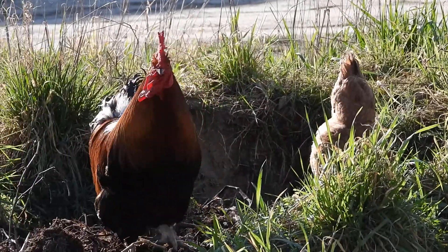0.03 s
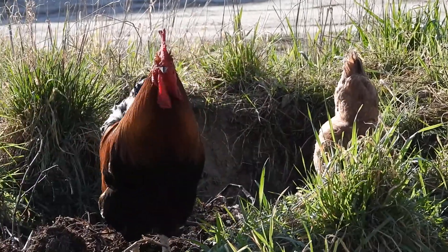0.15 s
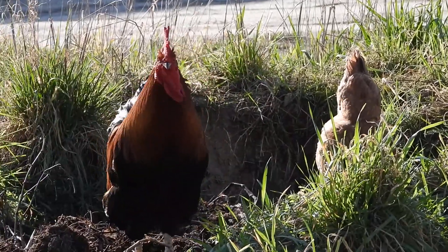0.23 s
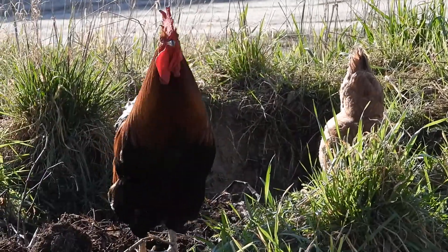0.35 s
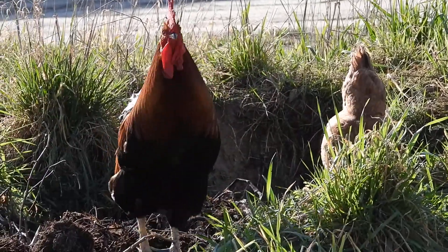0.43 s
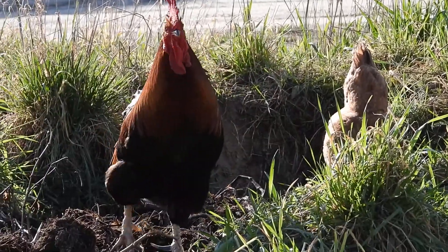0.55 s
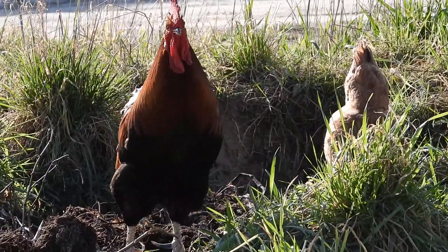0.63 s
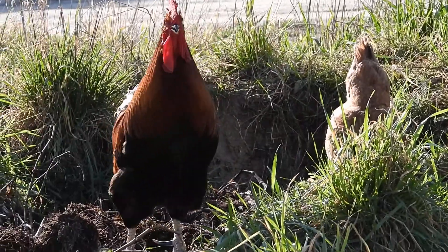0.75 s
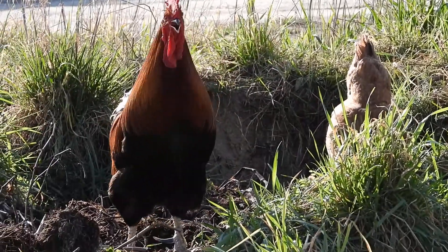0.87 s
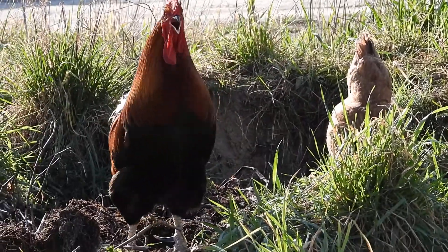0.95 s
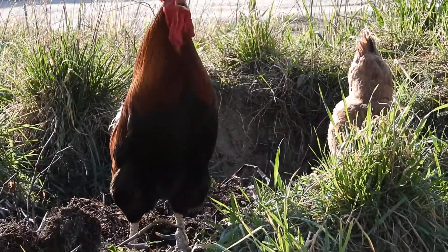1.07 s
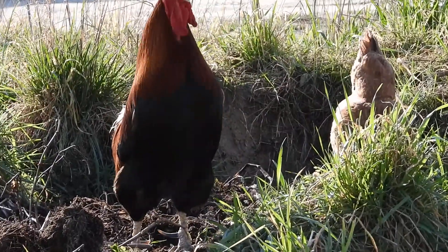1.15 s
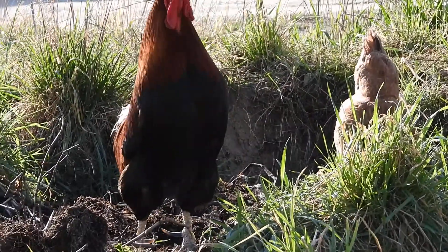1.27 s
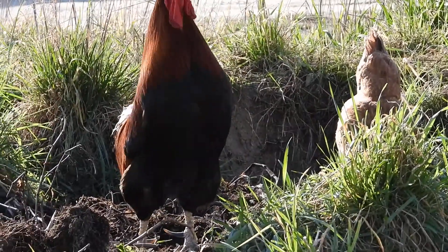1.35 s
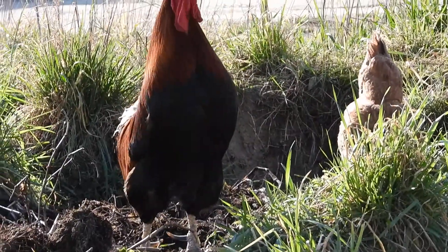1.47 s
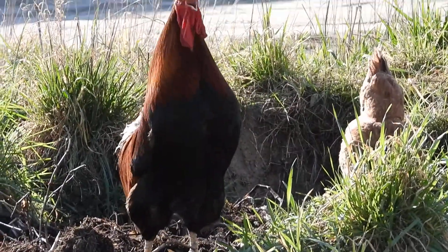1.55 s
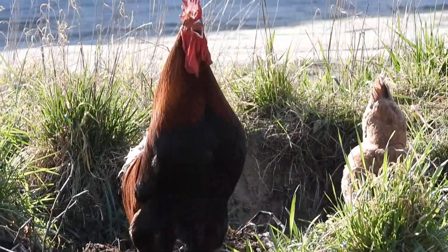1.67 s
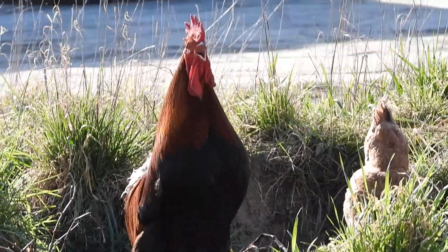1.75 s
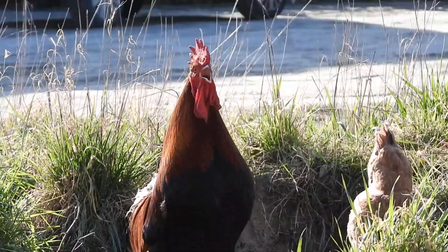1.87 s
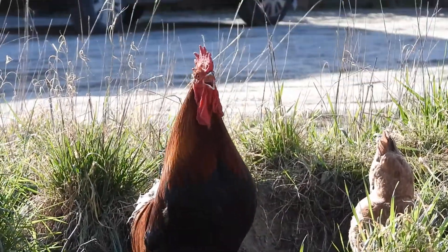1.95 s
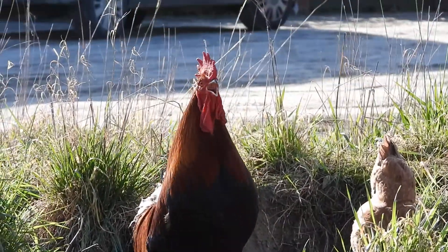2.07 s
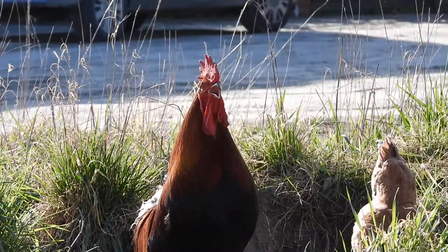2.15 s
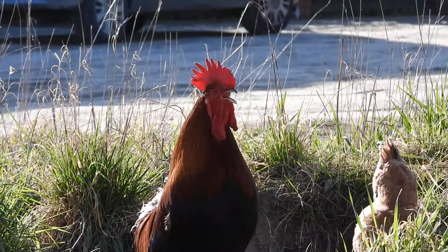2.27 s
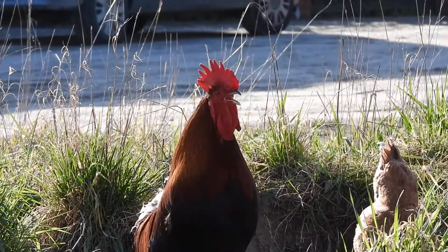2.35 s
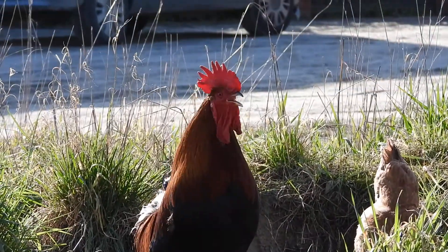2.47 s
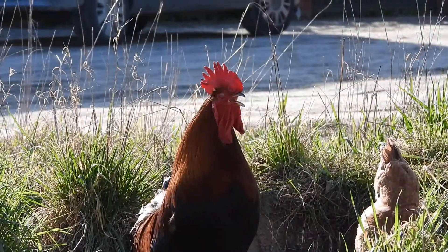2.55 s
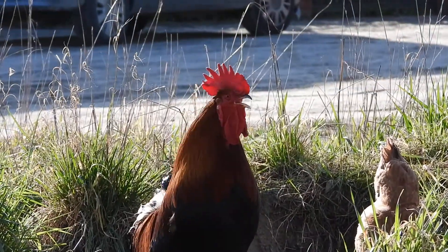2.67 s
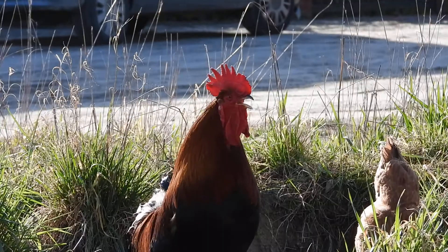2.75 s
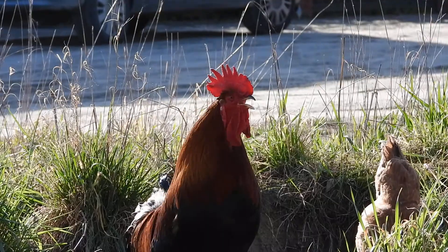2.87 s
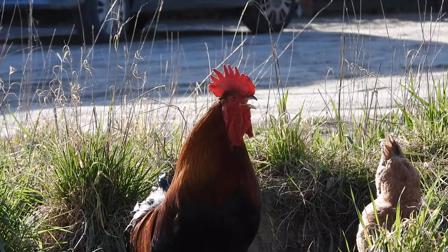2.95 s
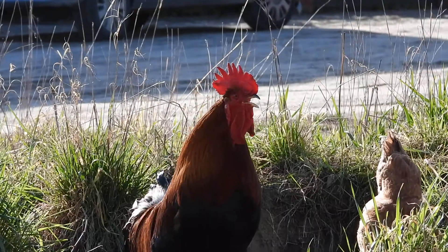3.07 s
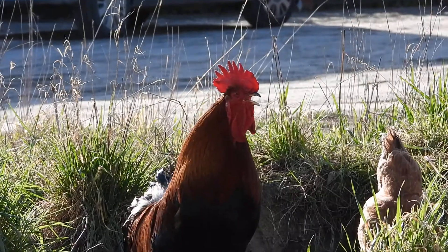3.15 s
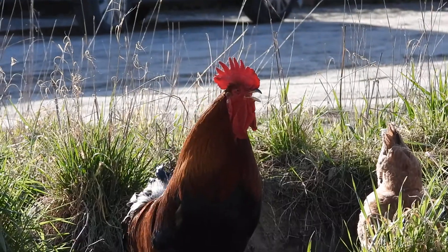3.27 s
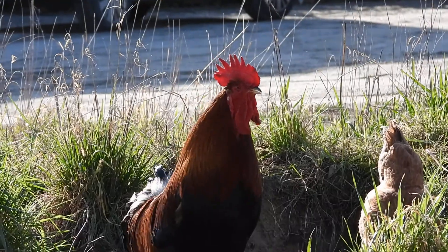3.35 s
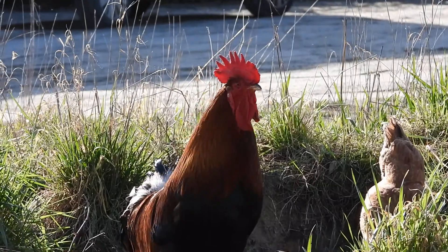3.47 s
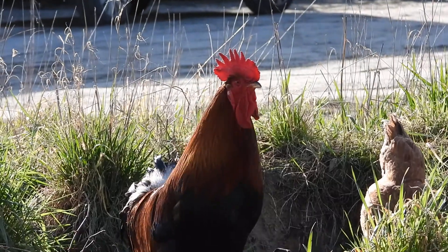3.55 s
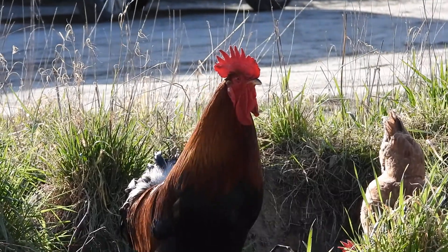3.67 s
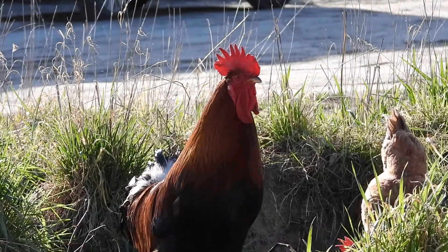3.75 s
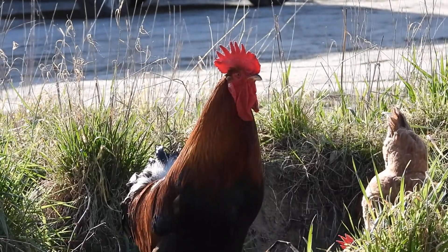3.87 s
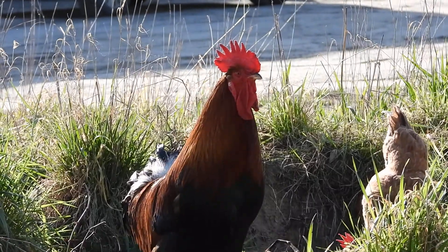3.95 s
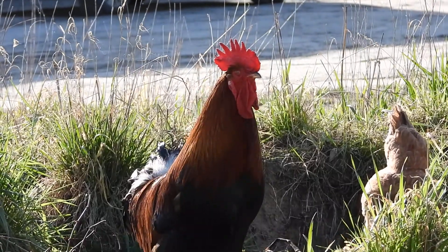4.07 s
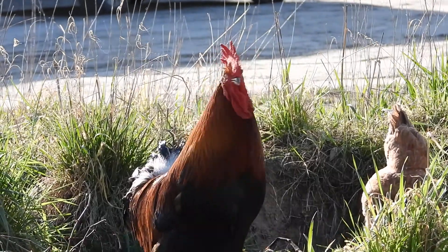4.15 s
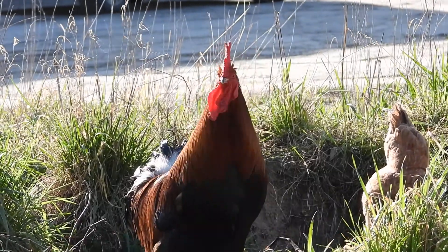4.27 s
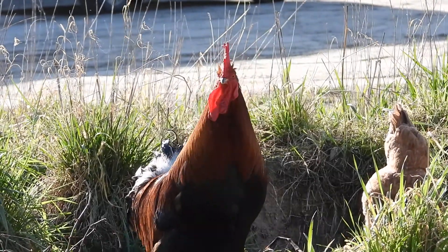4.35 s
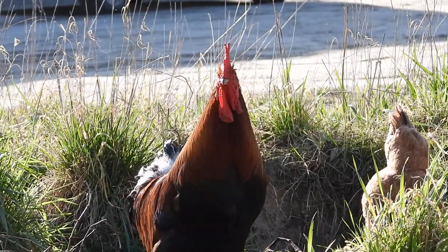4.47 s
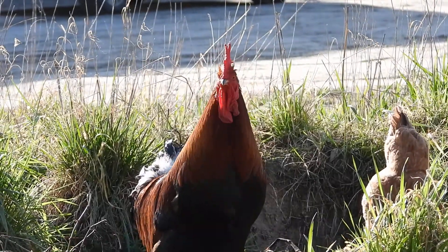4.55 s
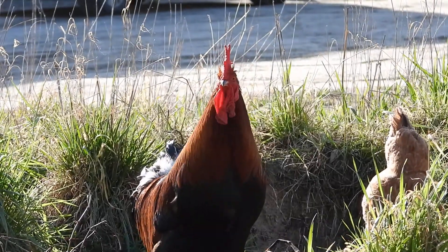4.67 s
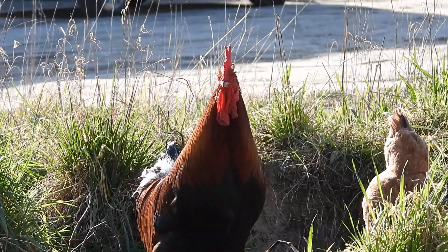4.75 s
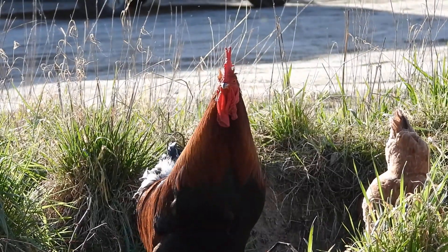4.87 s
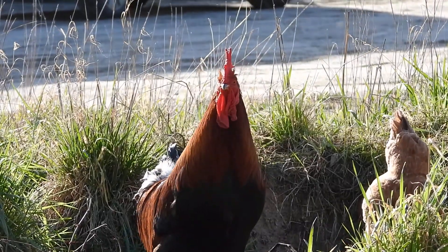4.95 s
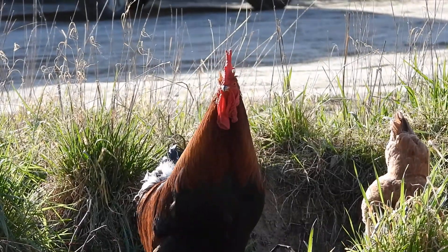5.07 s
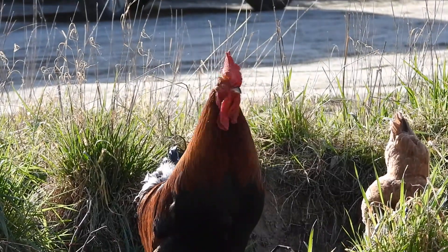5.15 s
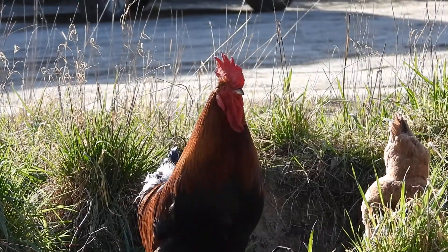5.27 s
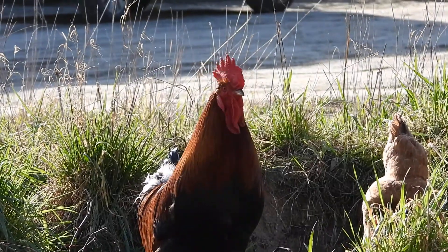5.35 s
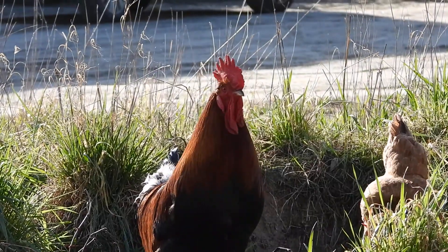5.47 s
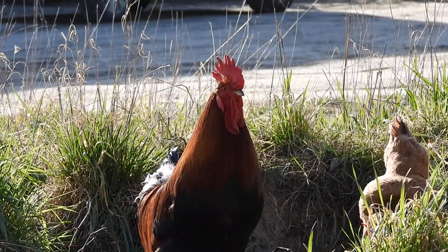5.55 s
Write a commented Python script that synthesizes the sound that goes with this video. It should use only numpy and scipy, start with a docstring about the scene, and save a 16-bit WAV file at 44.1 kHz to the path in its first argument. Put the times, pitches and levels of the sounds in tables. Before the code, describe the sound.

One loud rooster crow stands out against a quiet outdoor background of far traffic, small birds and soft puffs of high hiss. The birds come first, off to the left. Then the rooster, near the microphone, gives a brief raspy note and a long held one that drops as its breath runs out, with a slight echo. A hen's low mutter is barely heard beneath it, and scattered chirps and whistles follow.

```python
"""Distant traffic hums over a grassy yard while sparrows chirp and other small birds whistle. Then a
rooster crows close by, a short syllable and a long one: two membranes in its throat pulse air into the
windpipe, now locked to clear tones, now chaotic, and the pitch sags as the breath runs out. Far walls
send the crow back. A hen mutters once under its end, and soft puffs of bright hiss come and go."""
import sys
import numpy as np
from scipy import signal
from scipy.fft import rfft, irfft, next_fast_len
from scipy.io import wavfile
from scipy.ndimage import uniform_filter1d, map_coordinates

SR = 44100
rng = np.random.default_rng(int(sys.argv[2]) if len(sys.argv) > 2 else 0)


def waveform_to_disk(signal):
    """Save audio, clipped to [-1, 1], as 16-bit WAV at the path in sys.argv[1]."""
    frames = np.transpose(np.atleast_2d(signal))
    scaled = np.clip(frames, -1, 1) * 32767
    samples = np.round(scaled).astype(np.int16)
    wavfile.write(sys.argv[1], SR, samples)


N = 247822

# Colour of the traffic and of the hiss. Each row: frequency in Hz, relative level in dB.
TRAFFIC_SPECTRUM = [(24, -87.5), (40, -62), (91, -41), (177, -9), (329, -12.5), (364, -9), (466, -7.5),
                    (659, -8.5), (1030, -3.5), (1730, -16), (3220, -19), (3560, -19), (4680, -27.5),
                    (6950, -39.5), (15000, -75)]
HISS_SPECTRUM = [(2000, -54.0), (4000, -2.5), (6000, -10.0), (8500, -16.0), (11000, -61.0)]
# Puffs of bright hiss; the sharp one at 0.47 s is the breathy edge of a bird's rising whistle.
# Each row: peak time in seconds, peak level in dB, swell and fade in dB per second.
HISS_PUFFS = [(.2, -69, 80), (.47, -59.5, 400), (.92, -57.5, 198), (5.5, -68, 80)]
# Width of the noise bed. Each row: frequency in Hz, left-right likeness (clipped to -1..1).
BED_LIKENESS = [(60, 1.3), (180, 0.86), (550, 0.8), (1650, 1.5), (4970, -3), (15000, 0.1)]
# Panning of the bed and of the crow. Each row: frequency in Hz, left minus right in dB.
BED_PAN = [(60, -2.5), (180, -1), (550, 3), (1650, 4), (4970, 1.5), (15000, -17.5)]
CROW_PAN = [(60, -8.5), (120, -7.5), (240, -5), (480, 6), (950, -5), (1890, -2), (3770, -3), (7520, -1.5),
            (15000, -6)]
# Phase spread of the crow. Each row: frequency in Hz, lead of the left side in radians.
CROW_LEAD = [(200, 0), (700, .35), (2000, .3), (2800, .7), (4000, 1.5), (9000, 1.6)]
# The hen's mutter. Each row: time in seconds, pitch in Hz, level in dB.
HEN_MUTTER = [(3.085, 140, -94), (3.1, 171, -43), (3.14, 283, -46), (3.2, 308, -55.5), (3.28, 278, -67),
              (3.31, 273, -93)]
# Shape of one sparrow chirp. Each row: seconds into the chirp, pitch in Hz, relative level in dB.
CHIRP_SHAPE = [(0, 3080, -29), (.004, 3140, -3), (0.011, 3400, -6.5), (0.019, 4820, 3), (.024, 5450, -14.5),
               (0.032, 4790, -4), (0.043, 3443, 3.5), (.052, 3680, 3.5), (.062, 3040, -1.5),
               (.068, 2990, -22.5)]
# Sparrow cues. Each row: start in seconds, gain in dB, pitch factor.
CHIRP_CUES = [(0.081, -46.5, .95), (0.181, -58, 1.0), (3.017, -45, 1.05), (3.64, -44, 1.01),
              (4.41, -45.5, .97), (5.182, -61, 1.0), (5.443, -45, .99)]
# Whistle cues. Each row: start and length in seconds, first, middle and last pitch in Hz,
# peak level in dB, fraction of the length before the peak.
WHISTLE_CUES = [(0.413, 0.042, 2190, 1850, 1845, -55, .1), (0.452, .105, 1837, 5170, 3900, -44.5, 0.11),
                (0.509, .2, 2616, 2653, 2495, -50, 0.4), (3.639, 0.058, 3050, 3050, 3080, -48.5, .6),
                (4.319, 0.26, 2310, 2602, 2563, -48, 0.22), (5.153, 0.033, 4400, 4450, 4420, -56, .5),
                (5.542, .08, 4100, 4290, 4250, -56, 0.18)]
# Tails of the yard and of the nearby ground. Each row: frequency in Hz, seconds to fall 60 dB.
YARD_DECAY = [(300, 0.91), (1500, 0.31), (6000, 0.037)]
GROUND_DECAY = [(300, .05), (3000, 0.069), (10000, 0.048)]
# Slaps off far walls. Each row: delay in seconds, gain in dB.
WALL_SLAPS = [(.105, -27), (.15, -29), (.22, -31)]
# The crow's syllables. Each row: start and end of full voice in seconds, release in dB per second.
SYLLABLES = [(1.13, 1.3324, 1000), (1.403, 3.44, 650)]
# Held states of the membranes. Each row: start in seconds, pitch in Hz, amount of chaos,
# period doubling (every second pulse stronger) from 0 to 1, share of the second membrane from 0 to 1.
MEMBRANE_STAGES = [(1.12, 665, .26, .1, .05), (1.21, 660, .45, .4, .38), (1.295, 620, .5, .25, .15),
                   (1.38, 655, .5, 0, 0), (1.447, 774, .04, 0, 0), (1.48, 825, .04, 0, 0),
                   (1.495, 770, .04, 0, 0), (1.514, 634, .6, 0, .25), (1.7, 643, .55, 0, .58),
                   (2.1, 640, .5, 0, .35), (2.21, 637, .28, 0, .4), (2.27, 635, .09, 0, .45),
                   (2.383, 640, .38, .05, .45), (2.75, 640, .2, .15, .25), (2.8, 640, .06, .2, .04),
                   (2.895, 640, .09, .2, .1), (2.95, 640, .04, .2, .02), (3.08, 640, .02, .5, 0),
                   (3.2, 640, .02, .8, 0), (3.29, 640, .05, .8, 0), (3.325, 640, .01, .08, 0),
                   (3.4, 640, .17, .55, 0), (3.44, 600, .4, .9, 0)]
# The breath running out. Each row: time in seconds, pitch drop in Hz.
PITCH_SAG = [(2.7, 0), (2.8, 7.5), (3.0, 13.5), (3.15, 27), (3.29, 48), (3.36, 68.5), (3.4, 96),
             (3.43, 99.5), (3.48, 106)]
# The neck's movement. Each row: time in seconds, pose (0 stretched, 1 slack, 2 sinking).
NECK_POSE = [(1.27, .85), (1.33, .2), (1.4, .5), (1.44, 0), (2.05, .05), (2.24, .5), (2.375, .5),
             (2.39, .85), (2.74, 1), (3.0, 1), (3.22, 2), (3.34, 2), (3.41, 1.5)]
# The second membrane slackens with the neck. Each row: pose, pitch in Hz.
SECOND_PITCH = [(0, 1540), (.5, 1485), (1, 1383)]
# Resonances of windpipe and beak. Each row: centre in Hz for a stretched, a slack and a sinking neck,
# width in Hz, weight within its band in dB.
WINDPIPE_MODES = [(310, 330, 290, 140, 0), (754, 695, 510, 607, 1.5), (1507, 1411, 1340, 407, 0),
                  (2049, 1957, 1936, 289, 0), (2973, 2880, 2750, 220, 6.5), (3930, 4450, 2900, 240, -3),
                  (4720, 4780, 4530, 1300, 7.5), (5370, 5600, 8700, 110, 1.5), (6044, 5700, 6500, 430, 3),
                  (7600, 7300, 9000, 910, -5), (10100, 2100, 4600, 410, -10),
                  (11100, 12000, 9100, 640, -12.5)]
# Row numbers that split those resonances into seven bands, low to high.
BAND_EDGES = [0, 2, 3, 4, 5, 7, 9, 12]
# Dynamics, one curve a syllable. Each row: time in seconds, level in dB, then bands one, two and five
# in dB relative to that level.
VOICE_CURVES = [
    [(1.13, -10.5, -13.5, -9, -19.5), (1.162, -20, -3, -15, -7.5), (1.212, -10.5, -20.5, 1.5, -22.5),
     (1.22, -14, -6.5, -8.5, -18), (1.248, -11, -18.5, -1, -21.5), (1.308, -13, -8.5, -9.5, -14.5),
     (1.335, -16, -39, -15.5, -16.5)],
    [(1.4, -16.5, -21.5, -12, -16.5), (1.43, -10, -5, -10.5, -15.5), (1.47, -16, -6, 1.5, -9),
     (1.53, -12, -11, -4.5, -15), (1.56, -15, -9, -15, -18.5), (1.6, -15.5, -18.5, -12, -17),
     (1.68, -14, -7.5, -7, -13.5), (1.77, -12.5, -13.5, -1, -14.5), (2.09, -16, -11.5, -3.5, -14.5),
     (2.24, -16.5, -3, -12.5, -16), (2.38, -19, -5.5, -7.5, -20), (2.41, -20, -7.5, -4.5, -19.5),
     (2.78, -20.5, -6, -5.5, -22.5), (2.8, -22, -4.5, -9.5, -22), (3.09, -20, -5.5, -2, -21.5),
     (3.17, -23, -3.5, -6.5, -16.5), (3.35, -25, -10.5, -2.5, -12.5), (3.38, -30, -3.5, -11, -5),
     (3.42, -15.5, -0.5, -14, -20), (3.44, -24, -1.5, -3.5, -21)],
]
# Treble colour, one row a pose. Each row: bands four, six and seven in dB relative to band five.
TREBLE_BY_POSE = [(-5.5, -10.5, -20.5), (-1, -7.5, -16.5), (-9, -3.5, -16.5)]
# Notches cut by side cavities of the throat. Each row: centre in Hz, width in Hz, part swallowed in dB.
THROAT_HOLLOWS = [(3620, 500, -2.5), (5280, 350, -1.5)]

TRAFFIC_DB = -50
LEFT_LEAD_S = .00009  # sound from the left reaches the left side first
RISE_DB, FALL_DB = 7.5, 20  # a whistle swells to its peak, then dies away
ATTACK_DB_PER_S, GLIDE_S = 3500, .014  # onset of a syllable; glide from stage to stage
SCOOP_HZ, SCOOP_S = 131.2, .03  # each syllable starts flat and slides up to pitch
EDGE_CHAOS, EDGE_S = .25, .035  # extra chaos while the membranes start and stop
GROWL, GROWL_LOSS = 1.6, .7  # second membrane at half and quarter pitch; lost as the neck slackens
CEILING, TOP_HZ = .95, 15700


def amp(db):
    return 10 ** (np.asarray(db) / 20)


def unit(x):
    return x / np.sqrt(np.mean(x ** 2) + 1e-20)


def along(points, hz):
    """Read (Hz, value) points on a log frequency axis."""
    f, v = np.transpose(points)
    return np.interp(np.log(hz + 1), np.log(f + 1), v)


def curves(rows):
    """One value per sample for each column after the time."""
    s, *cols = np.transpose(rows)
    return [np.interp(np.arange(N) / SR, s, c) for c in cols]


def wobble(rate, count=N):
    """A smooth random curve, rate knots a second."""
    knots = rng.standard_normal(int(count * rate / SR) + 4)
    return map_coordinates(knots, [np.arange(count) * rate / SR])


def filtered(x, response):
    """x through a complex frequency response."""
    m = next_fast_len(N + SR // 2)
    return irfft(rfft(x, m) * response(np.fft.rfftfreq(m, 1 / SR)), m)[..., :N]


def resonance(f, modes):
    """Response of (Hz, width, dB) resonances, summed with alternating signs."""
    return sum((-1) ** k * amp(db) * 1j * f * w / (c * c - f * f + 1j * f * w)
               for k, (c, w, db) in enumerate(modes))


def pulses(phase, count):
    """A pulse train: equal harmonics of a running phase."""
    half = np.sin(phase / 2)
    half = np.where(np.abs(half) < 1e-6, 1e-6, half)
    return np.sin((count + .5) * phase) / (2 * half) - .5


def shimmer(x, depth_db, size):
    """Random swells and dips in patches of (frequency bins, frames)."""
    z = signal.stft(x, nperseg=512)[2]
    field = uniform_filter1d(rng.standard_normal(z.shape[-2:]), size[0], 0)
    field = uniform_filter1d(field, size[1], 1)
    return signal.istft(z * amp(depth_db * unit(field)), nperseg=512)[1][..., :N]


def pan(pan_db, lead):
    """Stereo response: level difference and phase lead, half on each side."""
    return (amp(pan_db / 2) * np.exp(.5j * lead)) ** np.array([[1], [-1]])


def noise_bed(spectrum, shimmer_db):
    """Coloured, shimmering stereo noise of rms 1."""
    noise = shimmer(rng.standard_normal((2, N)), shimmer_db, size=(6, 10))
    width = lambda hz: np.arccos(np.clip(along(BED_LIKENESS, hz), -1, 1)) / 2
    colour = lambda hz: amp(along(spectrum, hz)) * [np.cos(width(hz)), np.sin(width(hz))]
    mid, side = filtered(noise, colour)
    stereo = np.array([mid + side, mid - side])
    return unit(filtered(stereo, lambda hz: pan(along(BED_PAN, hz), 2 * np.pi * hz * LEFT_LEAD_S)))


def traffic():
    """Distant traffic: a low hum whose level wavers slightly."""
    return amp(TRAFFIC_DB + .6 * wobble(27)) * noise_bed(TRAFFIC_SPECTRUM, shimmer_db=1.4)


def hiss_puffs():
    """Puffs of bright hiss that swell and fade."""
    t = np.arange(N) / SR
    swells = sum(amp(db - slope * np.abs(t - s)) for s, db, slope in HISS_PUFFS)
    return swells * noise_bed(HISS_SPECTRUM, shimmer_db=1.5)


def hen():
    """A low, breathy mutter with a closed beak: pulses and noise through one steep resonance."""
    hz, db = curves(HEN_MUTTER)
    phase = 2 * np.pi * np.cumsum(hz) / SR + .67 * wobble(200)
    air = pulses(phase, count=4) + 12 * rng.standard_normal(N)
    mutter = filtered(air, lambda f: resonance(f, [(262, 350, 0)]) ** 2)
    return amp(db) * unit(mutter) * (db > HEN_MUTTER[0][2])


def bird_note(rows, breath_db, flutter_db, burr_hz):
    """A near-pure tone along (s, Hz, dB) rows; pitch and level tremble, and breath roughens it."""
    s, hz, db = np.transpose(rows)
    start = round(s[0] * SR)
    t = np.arange(start, min(N, round(s[-1] * SR))) / SR
    phase = 2 * np.pi * np.cumsum(np.interp(t, s, hz) + burr_hz * wobble(397, len(t))) / SR
    tone = (np.sin(phase) + .025 * np.sin(2 * phase)) * (1 + amp(breath_db) * wobble(7000, len(t)))
    envelope = amp(np.interp(t, s, db) + flutter_db * wobble(210, len(t)))
    out = np.zeros(N)
    out[start:start + len(t)] = np.sqrt(2) * tone * envelope
    return out


def whistle(start, length, first_hz, middle_hz, last_hz, peak_db, peak_at):
    """A small bird's whistle: an arc of pitch under a swell and a fade."""
    u = np.linspace(0, 1, num=12)
    hz = np.polyval(np.polyfit([0, .5, 1], [first_hz, middle_hz, last_hz], deg=2), u)
    db = peak_db - np.interp(u, [0, np.clip(peak_at, .05, .95), 1], [RISE_DB, 0, FALL_DB])
    rows = np.transpose([start + length * u, hz, db])
    return bird_note(rows, breath_db=-18, flutter_db=2.5, burr_hz=39.6)


def sparrow(start, gain_db, pitch_factor):
    """A burry chirp that flicks up in pitch and back down."""
    rows = [(start + s, hz * pitch_factor, gain_db + db) for s, hz, db in CHIRP_SHAPE]
    return bird_note(rows, breath_db=-21, flutter_db=3, burr_hz=220)


def reverb(x, decays, wet_db):
    """A diffuse tail, different on each side; each frequency dies at its own speed."""
    hz, t, z = signal.stft(rng.standard_normal((2, SR // 2)), SR, nperseg=128)
    tail = signal.istft(z * amp(-60 * t / along(decays, hz)[:, None]), SR, nperseg=128)[1]
    tail *= amp(wet_db) / np.linalg.norm(tail[0])
    return signal.fftconvolve(x[None], tail, axes=1)[:, :N]


def wall_echoes(x):
    """Dull slaps off far walls, a little later on the right."""
    dull = filtered(x, lambda hz: 1 / (1 + 1j * hz / 900) ** 2)
    late = lambda s: np.pad(dull, (round(s * SR), 0))[:N]
    return sum(amp(db) * np.array([late(s), late(s + .00018)]) for s, db in WALL_SLAPS)


def treble_waver(x):
    """The rooster's moving head makes the treble waver between left and right in a short tail."""
    bright = filtered(x, lambda hz: (1j * hz / (4000 + 1j * hz)) ** 2)
    return reverb(bright, GROUND_DECAY, wet_db=-9) * [wobble(12), wobble(12)]


def membrane_controls():
    """Held stages glide into each other; syllables scoop in and turn rough at their edges."""
    starts, *cols = np.transpose(MEMBRANE_STAGES)
    t = np.arange(N) / SR
    held = np.array(cols)[:, np.clip(np.searchsorted(starts, t) - 1, 0, None)]
    hz, chaos, doubling, share = uniform_filter1d(held, size=round(GLIDE_S * SR), axis=1)
    hz -= curves(PITCH_SAG)[0]
    for start, end, _ in SYLLABLES:
        hz -= SCOOP_HZ * np.exp(-np.clip(t - start, 0, None) / SCOOP_S) * (t > start - .02)
        chaos += EDGE_CHAOS * np.exp(-np.abs(t - start) / EDGE_S)
        chaos += EDGE_CHAOS * np.exp(-((t - end - EDGE_S) / EDGE_S) ** 2)
    return hz, chaos, doubling, share


def membranes(neck):
    """Two membranes pulse the air; chaos scatters the pulses' timing and size and adds breath."""
    hz, chaos, doubling, share = membrane_controls()
    growl = np.clip(GROWL * share * chaos * (1 - GROWL_LOSS * neck), 0, 1)
    smooth_phase = 2 * np.pi * np.cumsum(hz) / SR + 1.48 * chaos * wobble(45)
    phase = smooth_phase + chaos * (.75 * wobble(500) + .6 * wobble(120))
    main = pulses(phase, count=19) * (1 + doubling * np.cos(phase / 2))
    second_hz = np.interp(neck, *np.transpose(SECOND_PITCH)) + 5 * wobble(11)
    second_phase = 2 * np.pi * np.cumsum(second_hz) / SR + 1.93 * chaos * wobble(300)
    undertones = np.cos(second_phase / 2) + 1.3 * np.cos(second_phase / 4)
    # the main membrane modulates the second one: sum and difference tones
    second = 1.94 * pulses(second_phase, count=9) * (1 + .45 * np.cos(phase) + growl * undertones)
    breath = (.045 + 1.2 * chaos ** 2) * rng.standard_normal(N)
    body = .5 * (1 - growl) * np.cos(smooth_phase + (3.2 * growl + 2.1 * chaos ** 2) * wobble(150))
    body += .3 * growl * np.cos(second_phase / 2)
    croak = 2.5 * chaos * (doubling + .07) * np.cos(phase / 2 + 3 * chaos * wobble(110))  # octave down
    air = (1 - share) * main + share * second + breath + body + croak
    return air * amp(1.8 * chaos * wobble(130)), chaos


def band_levels(pose_mix):
    """Gain in dB of each windpipe band, gated into syllables; the third takes what the low two leave."""
    t = np.arange(N) / SR
    gates_db = [np.minimum(ATTACK_DB_PER_S * (t - start), release * (end - t)).clip(-200, 0)
                for start, end, release in SYLLABLES]
    db, first, second, fifth = curves(sum(VOICE_CURVES, []))
    third = 10 * np.log10(np.clip(1 - amp(2 * first) - amp(2 * second), .03, 1))
    fourth, sixth, seventh = fifth + np.transpose(TREBLE_BY_POSE) @ pose_mix
    return db + np.max(gates_db, axis=0) + np.array([first, second, third, fourth, fifth, sixth, seventh])


def windpipe(air, chaos, neck):
    """The pulses ring the windpipe, whose steep resonances crossfade with the pose of the neck."""
    pose_mix = np.clip(1 - np.abs(neck - np.arange(3)[:, None]), 0, 1)
    voice = np.zeros(N)
    for low, high, db in zip(BAND_EDGES, BAND_EDGES[1:], band_levels(pose_mix)):
        band = WINDPIPE_MODES[low:high]
        band_hz = band[0][0]
        order = 3 if band_hz < 2500 else 2  # low resonances fall off most steeply
        poses = [[(mode[k], *mode[-2:]) for mode in band] for k in range(3)]
        rings = filtered(air, lambda f: np.array([resonance(f, modes) for modes in poses]) ** order)
        ring = np.sum(pose_mix * rings, axis=0)
        if band_hz > 3500:  # small moves of tongue and beak swell the high overtones one by one
            ring = shimmer(ring, depth_db=4.5, size=(5, 18))
        ring *= amp(3.5 * chaos * wobble(75))  # in chaos each band gargles on its own
        slow_rms = np.sqrt(np.abs(uniform_filter1d(ring ** 2, size=3500)) + 1e-12)
        voice += amp(db) * ring / slow_rms
    return voice


def rooster():
    """Membranes drive the windpipe; the throat notches and damps the top, the beak radiates no bass."""
    neck, = curves(NECK_POSE)
    air, chaos = membranes(neck)
    voice = windpipe(air, chaos, neck)
    voice = filtered(voice, lambda f: np.prod([1 - resonance(f, [m]) for m in THROAT_HOLLOWS], axis=0))
    return filtered(voice, lambda f: (1j * f / (230 + 1j * f)) ** 3 / (1 + (f / 12000) ** 10))


def scene():
    """The crow up front, small birds farther off to the left, hen, traffic and hiss underneath."""
    crow = rooster()
    birds = sum(sparrow(*cue) for cue in CHIRP_CUES) + sum(whistle(*cue) for cue in WHISTLE_CUES)
    near = filtered(crow, lambda hz: pan(along(CROW_PAN, hz), along(CROW_LEAD, hz)))
    near += treble_waver(crow) + reverb(crow, YARD_DECAY, wet_db=-22.5) + wall_echoes(crow)
    far = filtered(birds, lambda hz: pan(8.1, 2 * np.pi * hz * LEFT_LEAD_S))
    far += reverb(birds, YARD_DECAY, wet_db=-3)
    far = filtered(far, lambda hz: (1j * hz / (1200 + 1j * hz)) ** 2)  # small beaks radiate no bass
    return near + far + hen() + traffic() + hiss_puffs()


def record(dry):
    """The microphone bends slightly to one side when loud, rounds off peaks and trims both band ends."""
    bent = dry + .0049 * dry ** 2
    soft = bent / (1 + np.abs(bent / CEILING) ** 6) ** (1 / 6)
    return filtered(soft, lambda hz: (hz < TOP_HZ) * 1j * hz / (30 + 1j * hz))


dry = scene()
out = record(dry)
waveform_to_disk(out)
```